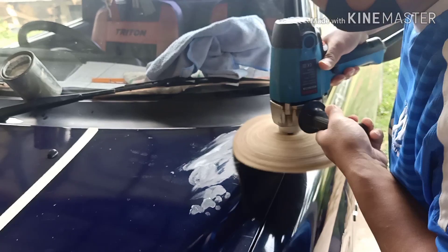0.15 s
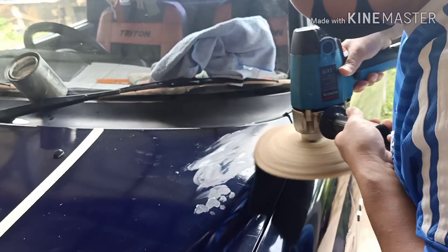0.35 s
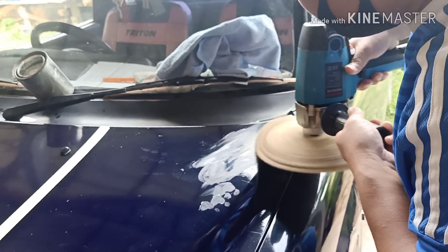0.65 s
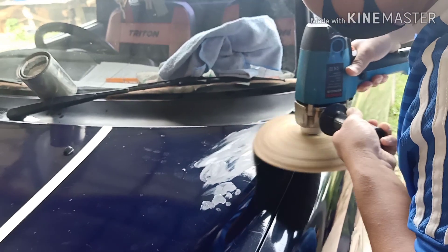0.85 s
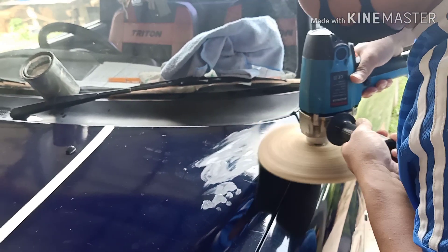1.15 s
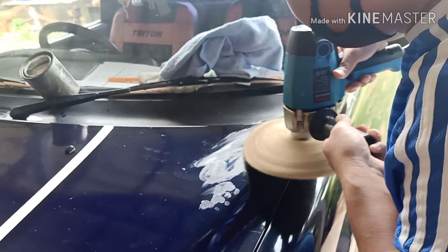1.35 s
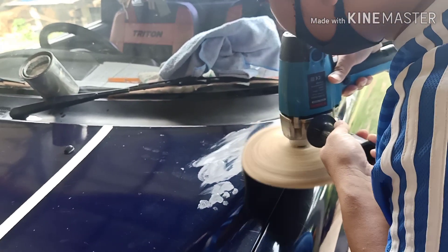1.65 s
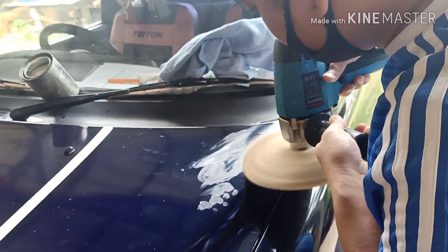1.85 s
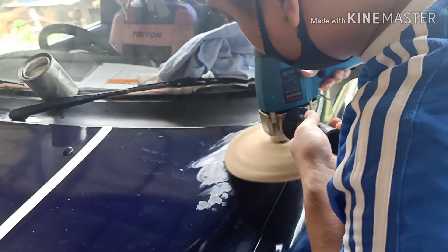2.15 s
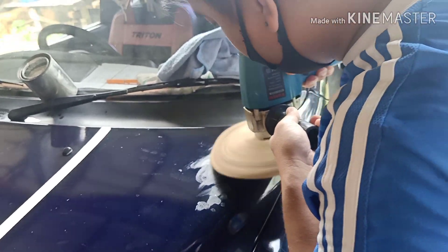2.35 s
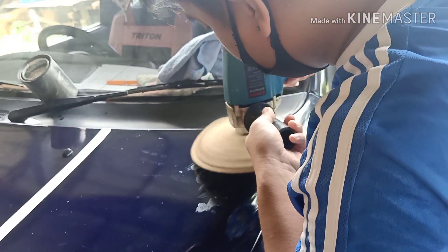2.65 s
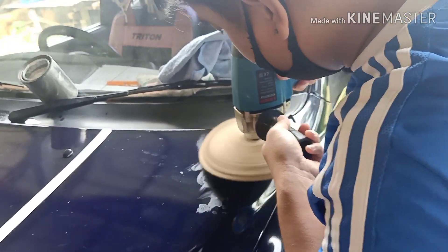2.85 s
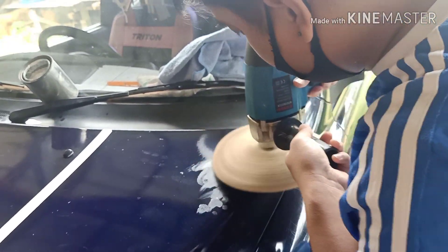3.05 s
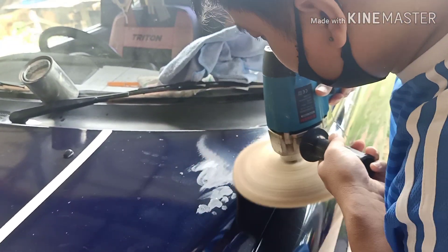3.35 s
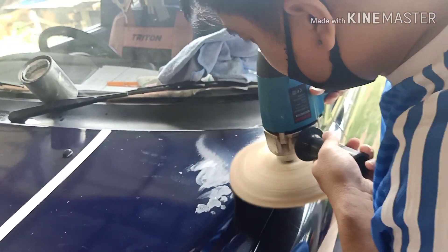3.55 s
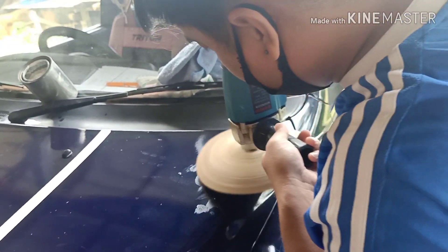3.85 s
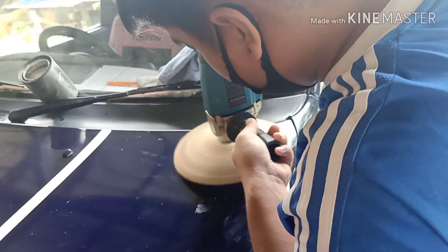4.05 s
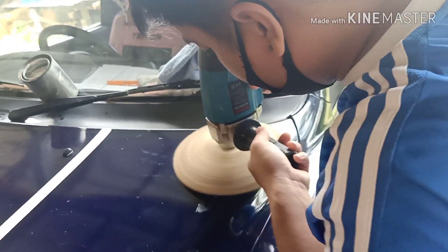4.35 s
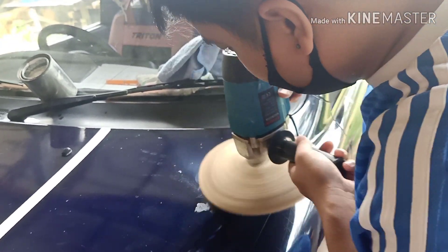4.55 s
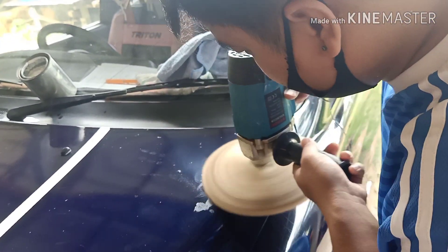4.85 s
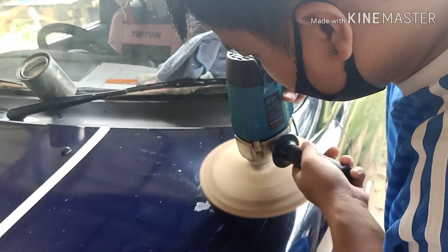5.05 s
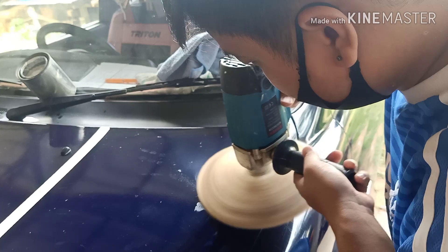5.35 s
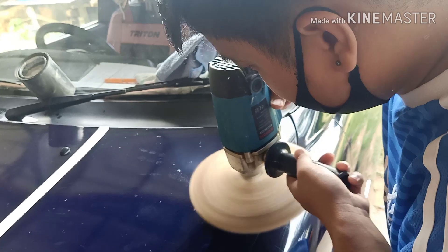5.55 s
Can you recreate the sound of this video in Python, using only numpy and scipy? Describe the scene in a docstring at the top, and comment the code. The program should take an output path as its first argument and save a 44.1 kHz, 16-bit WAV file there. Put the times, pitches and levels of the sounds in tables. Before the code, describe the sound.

An electric rotary polisher spins up and runs with a steady, throbbing high whine as its pad rubs a car's paint.

```python
"""Rotary polisher on car paint.

An electric polisher runs up close by, its speed sagging whenever the pad is pressed down.
The meshing of its seven-tooth pinion radiates a harmonic whine, which throbs as the turning
pad modulates the load. Tooth impacts and brush friction excite the housing's modes; beneath
them lie the motor's tones, the fan's rush, and the pad rubbing and drumming on the panel."""
import sys
import numpy as np
from scipy.fft import rfft, irfft, next_fast_len
from scipy.io import wavfile
from scipy.ndimage import uniform_filter1d, minimum_filter1d, map_coordinates

SR = 44100
rng = np.random.default_rng(int(sys.argv[2]) if len(sys.argv) > 2 else 0)


def inscribe(sig):
    """Save sig as 16-bit PCM at rate SR to the path in sys.argv[1].

    A 1-D sig is mono; a 2-D sig holds one channel per row.
    Samples are clipped to [-1, 1] before scaling.
    """
    pcm = np.round(np.clip(np.atleast_2d(sig).T, -1, 1) * 32767)
    wavfile.write(sys.argv[1], SR, pcm.astype(np.int16))


N = 250929
TIME = np.arange(N) / SR
PINION_TEETH, TEETH_PER_PAD_TURN = 7, 80
RIPPLE_HZ = 100  # twice the mains frequency


def amp(db):
    """Amplitude ratio of a level in decibels."""
    return 10 ** (np.asarray(db) / 20)


def unit(x):
    """Normalisation to rms 1."""
    return x / np.sqrt(np.mean(x ** 2) + 1e-20)


def curves(rows):
    """Linear interpolation in time of each column after the first."""
    times, *columns = np.transpose(rows)
    return [np.interp(TIME, times, column) for column in columns]


def swell(crest, length):
    """Gaussian envelope about a crest time."""
    return np.exp(-2 * ((TIME - crest) / length) ** 2)


def wobble(rate):
    """Smooth random modulation with rate knots a second."""
    return map_coordinates(rng.standard_normal(int(N * rate / SR) + 4), [TIME * rate])


def filtered(x, response):
    """Linear filtering: the spectrum times a frequency response."""
    size = next_fast_len(N + SR // 4)
    return irfft(rfft(x, size) * response(np.fft.rfftfreq(size, 1 / SR)), size)[:N]


def colour(points, hz):
    """Magnitude response through (f/Hz, level/dB) points on a log frequency axis."""
    f, db = np.transpose(points)
    return amp(np.interp(np.log(hz + 1), np.log(f), db))


def noise(spectrum):
    """Spectrally shaped Gaussian noise of rms 1."""
    return unit(filtered(rng.standard_normal(N), lambda hz: colour(spectrum, hz)))


def cycle(turns):
    """Sinusoid of a phase in cycles, from a random starting angle."""
    return np.cos(2 * np.pi * (turns + rng.random()))


def tone(turns, db, flutter_db, drift):
    """Partial at an rms level, randomly modulated in amplitude and in phase (drift, in cycles)."""
    return np.sqrt(2) * amp(db + flutter_db * wobble(14)) * cycle(turns + drift * wobble(25))


def resonances(modes, hz):
    """Modal superposition: damped second-order resonators of alternating sign."""
    return sum((-1) ** k * amp(db) * 1j * hz * width / (f * f - hz * hz + 1j * hz * width)
               for k, (f, width, db) in enumerate(modes))


def casing_level(hz):
    """Resonant radiation: a tone's level in dB rises as it sweeps through a peak of the casing."""
    # casing resonances: f/Hz, width/Hz, peak level/dB
    peaks = [(1100, 190, -29), (1570, 400, -25), (1930, 140, -31), (2330, 340, -24.5), (2810, 230, -28),
             (3054, 150, -40.5), (3297, 110, -38), (3600, 298, -26), (4624, 220, -40), (4840, 134, -39),
             (5444, 220, -42), (6152, 220, -46.5)]
    floor_db = -78
    grid = np.linspace(300, 12000, num=2000)
    power = sum(amp(db) ** 2 / (1 + ((grid - f) / width) ** 2) ** 4 for f, width, db in peaks)
    return np.interp(hz, grid, 10 * np.log10(power + amp(floor_db) ** 2))


def coil_hum():
    """Magnetic force: the field coils hum at twice the mains frequency."""
    # hum: t/s, relative level/dB
    levels = [(0.0, -60.7), (0.12, -49.5), (1.08, -56.5), (1.48, -47.1), (1.64, -54.2), (2.88, -53),
              (3.16, -73), (3.48, -53), (4.0, -57), (4.24, -46), (4.64, -67.1), (4.92, -70), (5.16, -74),
              (5.64, -64)]
    return tone(RIPPLE_HZ * TIME, curves(levels)[0] + .3, flutter_db=.7, drift=.025)


def panel_thrum(teeth, speed):
    """Forced vibration: the pad drums on the panel four times a turn, harder where it catches."""
    # judders of the pad: crest t/s, length/s, relative thrum level/dB, relative overtone level/dB
    judders = [(0.884, 0.26, -55, -68), (1.33, 0.26, -54, -64), (3.1, .25, -59, -66), (4.031, .3, -53, -76),
               (4.5, 0.26, -40, -53), (4.856, 0.099, -75, -55), (5.073, 0.16, -48.5, -66),
               (5.23, 0.17, -72, -50.5), (5.583, 0.17, -53, -87)]
    thrum_gain, overtone_gain = amp(-62.5) * speed, amp(-56) * speed ** 2
    for crest, length, thrum_db, overtone_db in judders:
        thrum_gain += swell(crest, length) * amp(thrum_db)
        overtone_gain += swell(crest, length) * amp(overtone_db)
    beats = 4 * teeth / TEETH_PER_PAD_TURN
    thrum = thrum_gain * tone(beats, -1.2, flutter_db=0, drift=.03)
    overtone = overtone_gain * tone(2 * beats, -2.2, flutter_db=1.9, drift=.06)
    rumble = thrum_gain * amp(-17) * noise([(20, -8), (45, -15), (120, 6), (200, -15), (600, -60)])
    return thrum + overtone + rumble


def panel_ring():
    """Resonance: broadband friction excites the hollow ring of the panel."""
    # panel modes: f/Hz, bandwidth/Hz, gain/dB
    modes = [(773, 78, -4.5), (880, 29, 1), (1011, 96, -6)]
    # ring: t/s, relative level/dB
    levels = [(0.3, -32), (1.0, -39), (1.4, -34.5), (2.26, -38), (3.14, -35.5), (3.22, -38.5), (4.27, -40),
              (5.66, -41)]
    ring = unit(filtered(rng.standard_normal(N), lambda hz: resonances(modes, hz)))
    return amp(curves(levels)[0] - 3.5) * ring


def pad_rub(load, speed, settled_hz):
    """Sliding friction: a low rush that grows with speed and with the pressure that slows the motor."""
    # friction spectrum: f/Hz, relative density level/dB
    spectrum = [(40, -22), (130, -9), (220, -5.5), (270, -4.5), (330, 1), (420, 1.5), (520, -1.5),
                (650, -15), (1200, -31.5)]
    free_hz = 1642  # mesh rate with the pad barely pressed
    rub_db = -52.5 + .0478 * (free_hz - settled_hz) + .6 * load
    return amp(rub_db) * speed ** .67 * noise(spectrum)


def air_and_hiss(load):
    """Broadband noise of flow and friction: the fan rushes and the pad hisses on the compound."""
    # fan air spectrum: f/Hz, relative density level/dB
    air_spectrum = [(25, -28), (55, -22), (110, -6.5), (200, -14), (380, -10), (600, -7.5), (800, 3),
                    (1200, -2.5), (3100, 3), (3500, 1.5), (3950, 7), (4450, -1.5), (5450, 1), (6800, -14.5),
                    (9000, -24), (16000, -39)]
    # pad hiss spectrum: f/Hz, relative density level/dB
    hiss_spectrum = [(1000, -19), (6500, -2.5), (7800, -1.5), (9200, -7), (10000, 10.5), (10600, 3),
                     (11300, 11.5), (12300, -1), (13400, 13.5), (14500, -3), (15600, 9)]
    # noise envelopes: t/s, relative air level/dB, relative hiss level/dB
    levels = [(0.02, -45, -58), (0.41, -38, -54), (0.96, -46, -58), (1.76, -43.5, -54.5),
              (2.55, -44.5, -63), (2.99, -41, -55), (3.95, -42.5, -57), (4.83, -39.5, -53.5),
              (4.95, -41.5, -54.5), (5.66, -39.5, -52)]
    air_db, hiss_db = curves(levels)
    air = amp(air_db + 8.5 + .45 * wobble(36) + .1 * load) * noise(air_spectrum)
    hiss = amp(hiss_db + 2 + 1.1 * load + 1.5 * wobble(200)) * noise(hiss_spectrum)
    return air + hiss


def fan_tones(rotor, speed):
    """Rotational harmonics: the armature's fan sings at multiples of the shaft rate near full speed."""
    # partials: order/(cycles per rotor turn), level/dB
    orders = [(1, -57.5), (4, -49), (10, -36), (11, -38), (20, -61), (28, -60), (31, -68), (37, -69),
              (38, -70), (42, -82), (49, -68), (55, -76), (56, -73)]
    tones = sum(tone(k * rotor, db + 1.1 * wobble(3.08), flutter_db=2, drift=.2) for k, db in orders)
    return tones * np.minimum(speed, 1) ** 7


def brush_whistle(rotor, mesh_hz, speed):
    """Periodic contact: the brushes whistle at the rate of the passing commutator bars."""
    bars = 24
    level_db = casing_level(bars * mesh_hz / PINION_TEETH) + .3
    bounce = .2 * wobble(170)
    whistle = tone(bars * rotor + bounce, level_db, flutter_db=-.5, drift=.14)
    return whistle * np.minimum(speed, 1) ** 13


def slot_tone(rotor, speed, effort_db):
    """Modulation: twelve slots pass the poles, and current ripple adds sidebands that grow with effort."""
    # slot tone: t/s, relative level/dB
    levels = [(0.6, -28), (1.36, -44), (1.56, -33.0), (1.84, -36.8), (3.08, -28), (3.56, -45), (3.8, -31),
              (4.32, -28), (4.44, -34), (4.72, -29.5), (4.84, -37), (5.28, -33.5), (5.64, -35)]
    passes, ripple = 12 * rotor, RIPPLE_HZ * TIME
    sideband_db = -39.5 + 1.3 * effort_db
    centre = tone(passes + .028 * wobble(120), curves(levels)[0] - .7, flutter_db=-.6, drift=.08)
    below = tone(passes - ripple, sideband_db + .3, flutter_db=3, drift=.14)
    above = tone(passes + ripple, sideband_db, flutter_db=1.9, drift=.13)
    return (centre + below + above) * np.minimum(speed / .89, 1) ** 14


def tooth_load(teeth, speed, effort_db):
    """Periodic loading: the pad catches twice and four times a turn, swinging the force on the teeth."""
    # twice-a-turn throb: t/s, relative depth
    depths = [(0, 0.072), (1, 0.18), (1.4, 0.092), (2.2, .19), (2.6, 0.35), (3.2, 0.51), (3.8, 0.38),
              (4.15, 0.24), (5.69, 0.16)]
    pad_angle = 2 * np.pi * (teeth / TEETH_PER_PAD_TURN + rng.random())
    twice, = curves(depths)
    four_times = (.46 + .0846 * effort_db + .078 * wobble(3.86)) * np.minimum(speed, 1) ** 6
    return 1.15 * (twice * np.cos(2 * pad_angle) + four_times * np.cos(4 * pad_angle))


def housing_rattle(teeth, load, ripple, speed, level_db):
    """Impact and friction excitation: uneven tooth blows and scraping brushes ring the housing."""
    # modes of gear case and motor shell: f/Hz, bandwidth/Hz, gain/dB
    modes = [(858, 250, -17), (1574, 286, -4.5), (2373, 305, 0.5), (2601, 241, 0.5), (2793, 317, -4),
             (4170, 370, -18.5), (5440, 450, -13)]
    # spectral weighting of the rattle: f/Hz, gain/dB
    tilt = [(30, -40), (400, -25), (640, -1), (780, 2.5), (3000, 3), (5800, -3.5), (7000, -10), (9000, -24),
            (16000, -22)]
    hits = np.flatnonzero(np.diff(np.floor(teeth + .12 * wobble(900))) > 0)
    blows = np.zeros(N)
    blows[hits] = rng.standard_normal(N)[:len(hits)]
    drive = unit(blows) + 1.02 * rng.standard_normal(N)
    chatter_db = (.93 + 3 * np.maximum(1 - speed, 0)) * wobble(170)  # backlash, most in the run-up
    buzz_db = .5 * ripple + 2.6 * ripple ** 2  # brushes scrape hardest at the current's crests
    shafts_db = cycle(teeth / PINION_TEETH) + cycle(teeth / TEETH_PER_PAD_TURN)
    throb_db = (.7 + 12 * np.clip(1 - speed, 0, .2)) * load
    drive *= amp(throb_db + buzz_db + shafts_db + chatter_db)
    rattle = filtered(drive, lambda hz: resonances(modes, hz) * colour(tilt, hz))
    return amp(level_db + .03) * unit(rattle)


def grind(slack):
    """Random amplitude modulation: loose teeth roughen a partial at low speed."""
    scatter = 4 * slack * (wobble(190) + 1j * wobble(190))
    return np.abs(1 + scatter) / np.sqrt(1 + (4.5 * slack) ** 2)


def gear_whine(teeth, mesh_hz, load, ripple, speed):
    """Gear-mesh harmonics: five partials pulse with the load, the lower four shaped by the casing."""
    # contour of the fundamental: t/s, relative level/dB before scaling
    contour = [(0.9, -26.5), (1.02, -25.5), (1.82, -24), (2.86, -29.5), (2.98, -27), (3.46, -25.5),
               (3.58, -28), (3.78, -25), (3.98, -27), (4.58, -27), (4.78, -24.7), (5.06, -28.0),
               (5.66, -28)]
    # brief swells and dips: crest t/s, length/s, second harmonic rise/dB, third harmonic rise/dB
    singing = [(.3, 0.075, 0.5, 7.5), (.9, .12, 2, -2), (1.296, 0.14, 3, 4.5), (1.82, .2, -2, 3.5),
               (2.2, 0.37, 7, -1), (3.6, .12, 6, -4), (3.92, .12, 9, 1.5), (4.1, .25, 0, 5),
               (4.563, .12, 3, 4), (4.749, .18, 7.5, -5), (5.3, 0.22, 5.5, 0.5)]
    # thin fifth harmonic: t/s, relative level/dB
    fifth_levels = [(.8, -65), (1.3, -60), (1.55, -66), (2.25, -57), (2.95, -60), (3.15, -57), (3.7, -53),
                    (4.15, -66), (4.35, -56), (5.4, -49.5), (5.69, -50)]
    slack = np.clip(1 - speed, 0, .3)
    contour_db, = curves(contour)
    rise2, rise3 = sum(np.outer(rises, swell(crest, length)) for crest, length, *rises in singing)
    db1, db2, db3, db4 = [casing_level(k * mesh_hz) for k in range(1, 5)]
    db1 += 1.24 * (contour_db - contour_db.mean()) - 1.4
    db2 += rise2 + 12 * slack - 3
    db3 += rise3 - 1.3
    turns = teeth + .23 * slack * wobble(131.3)
    mesh = grind(slack) * tone(turns, db1, flutter_db=.5, drift=.008)
    mesh += grind(slack) * tone(2 * turns + .11 * slack * wobble(150), db2, flutter_db=2.7, drift=.18)
    mesh += grind(slack) * tone(3 * turns + (.017 + .34 * slack) * wobble(150),
                                db3 + .68 * wobble(5.14), flutter_db=1.6, drift=.14)
    mesh += tone(4 * turns, db4 - 45 * slack + 1.5 * wobble(4), flutter_db=0, drift=.1)
    mesh += tone(5 * turns, curves(fifth_levels)[0] - .8, flutter_db=1.5, drift=.08)
    bite = 1 - np.exp(-TIME / .032)  # the teeth take up the load
    throb = unit(amp(7.44 * load + 3.2 * ripple))  # contact stiffens under load: sharp crests
    return bite * mesh * throb


def scene():
    """Superposition of sources tied to one motor, which runs up, then sags and recovers under the hand."""
    # speed the motor settles at under pressure: t/s, tooth-mesh f/Hz
    mesh_rates = [(0, 1525), (.9, 1525), (1.15, 1574), (1.4, 1563), (1.68, 1603), (2.05, 1593),
                  (2.52, 1531), (2.77, 1521), (2.89, 1565), (3.3, 1579), (3.62, 1600), (3.8, 1578),
                  (4.1, 1546), (4.43, 1628), (5, 1632), (5.22, 1638), (5.5, 1632), (5.69, 1633)]
    # how hard the gears work: t/s, rattle level/dB
    effort = [(0.0, -23), (0.12, -21.5), (0.68, -23), (1.24, -27.9), (1.56, -24), (1.92, -24.5),
              (2.24, -27), (3.0, -23.5), (3.52, -26), (3.76, -24.5), (4.12, -26.5), (4.28, -22.5),
              (4.44, -25), (4.72, -25), (4.84, -26.0), (5.64, -25.5)]
    start_share, spin_up_s = .418, .379
    settled_hz, = curves(mesh_rates)
    mesh_hz = settled_hz * (1 - (1 - start_share) * np.exp(-TIME / spin_up_s))
    speed = mesh_hz / np.median(mesh_hz)
    teeth = np.cumsum(mesh_hz) / SR  # count of teeth meshed
    rotor = teeth / PINION_TEETH  # count of rotor turns
    rattle_db, = curves(effort)
    effort_db = rattle_db - rattle_db.mean()
    ripple = cycle(RIPPLE_HZ * TIME)  # the torque ripples with the current
    load = tooth_load(teeth, speed, effort_db)
    motor = fan_tones(rotor, speed) + brush_whistle(rotor, mesh_hz, speed)
    motor += slot_tone(rotor, speed, effort_db)
    gears = gear_whine(teeth, mesh_hz, load, ripple, speed)
    gears += housing_rattle(teeth, load, ripple, speed, rattle_db)
    car = panel_ring() + pad_rub(load, speed, settled_hz) + panel_thrum(teeth, speed)
    return (coil_hum() + air_and_hiss(load) + car + motor + gears)[None]


def record(dry):
    """Peak and band limiting: a smoothed gain holds the crests down, and a low-pass cuts the top."""
    ceiling, top_hz = .345, 15550
    needed = np.minimum(1, ceiling / (np.abs(dry[0]) + 1e-9))
    gain = uniform_filter1d(minimum_filter1d(needed, size=129), size=129)
    return filtered(dry[0] * gain, lambda hz: hz < top_hz)[None]


dry = scene()
out = record(dry)
inscribe(out)
```